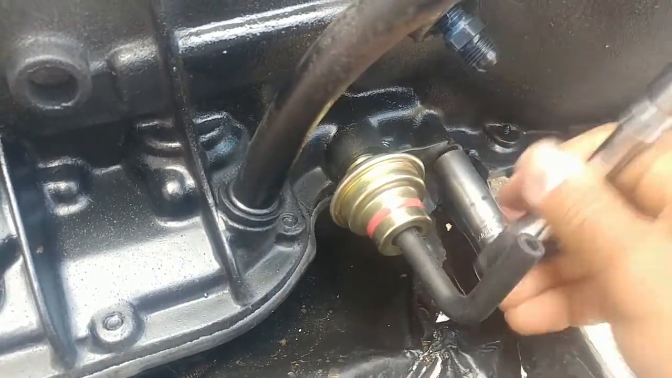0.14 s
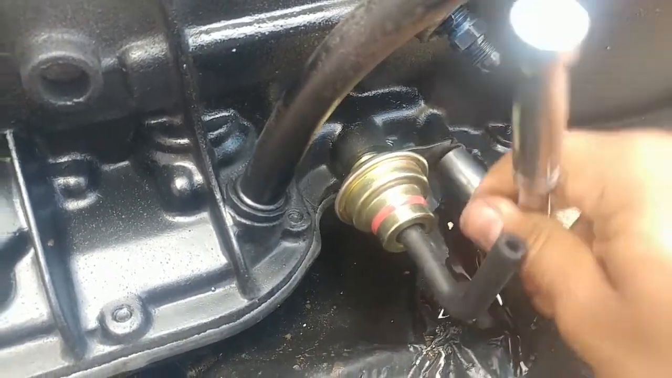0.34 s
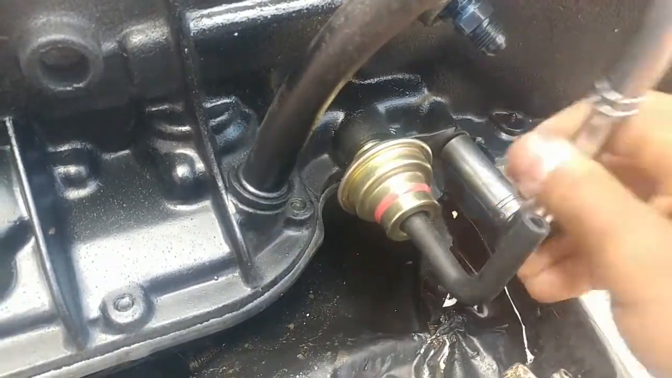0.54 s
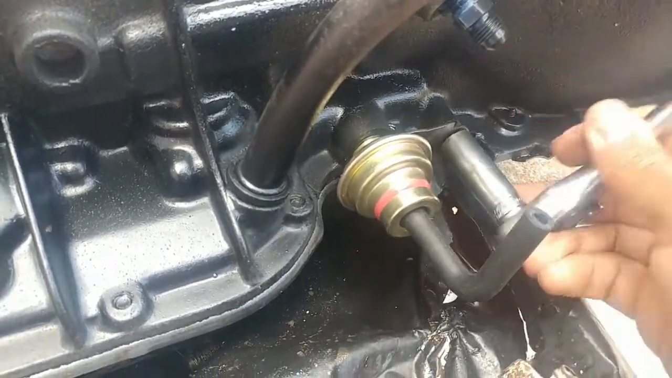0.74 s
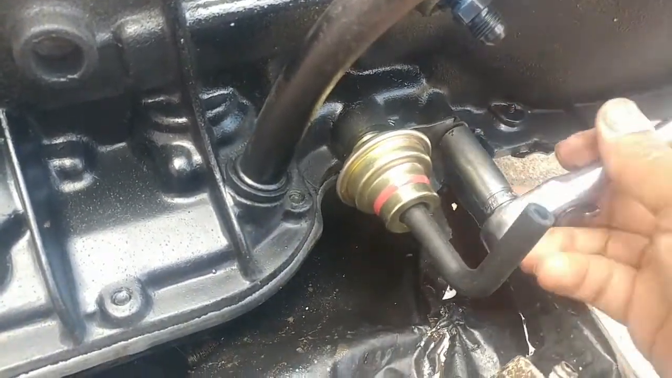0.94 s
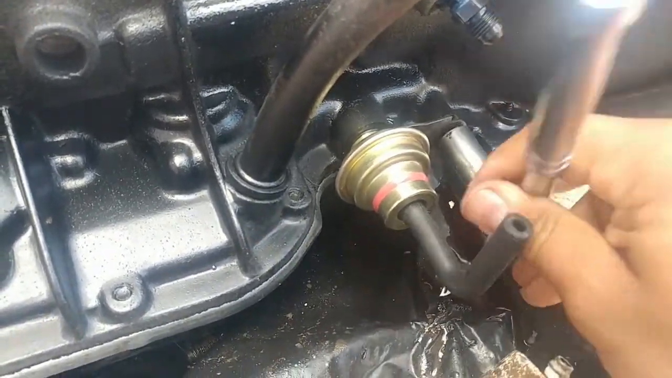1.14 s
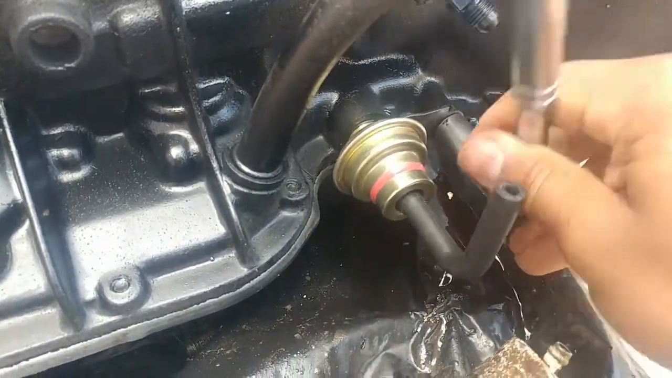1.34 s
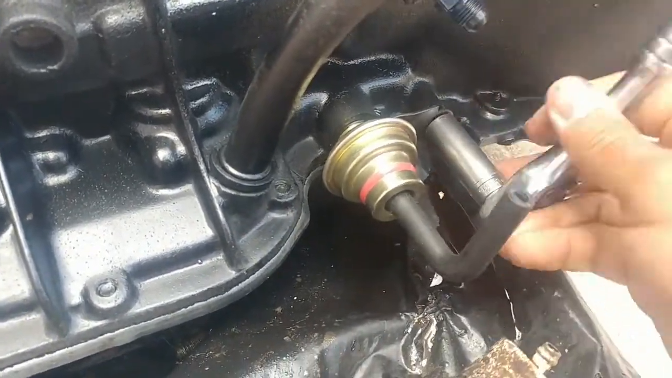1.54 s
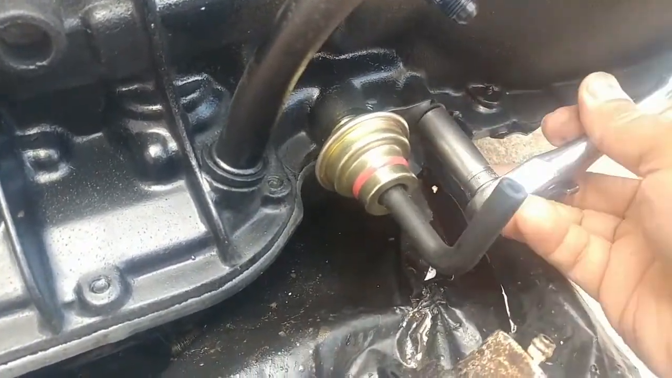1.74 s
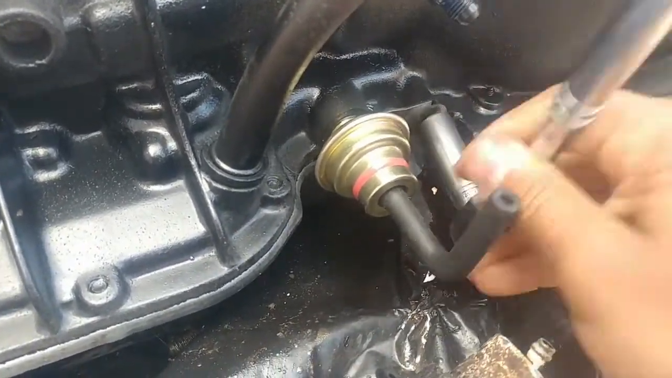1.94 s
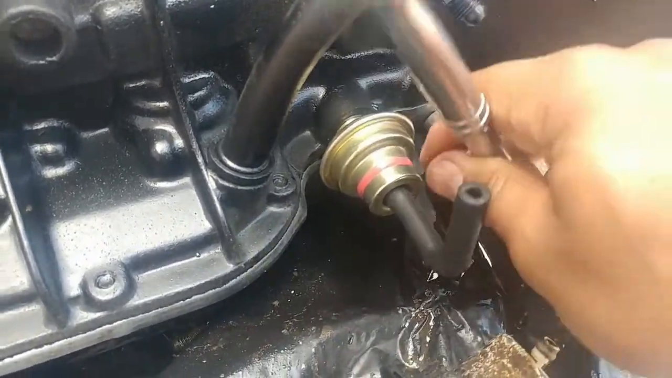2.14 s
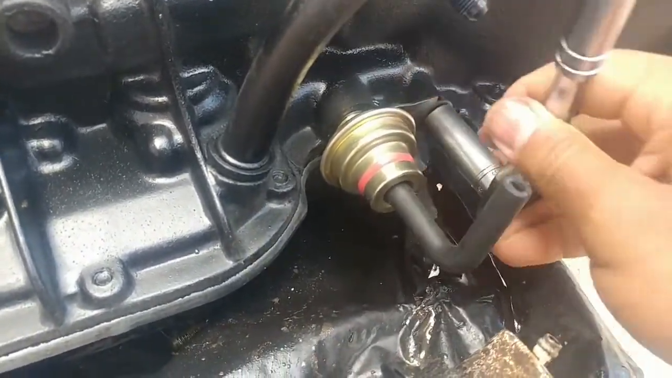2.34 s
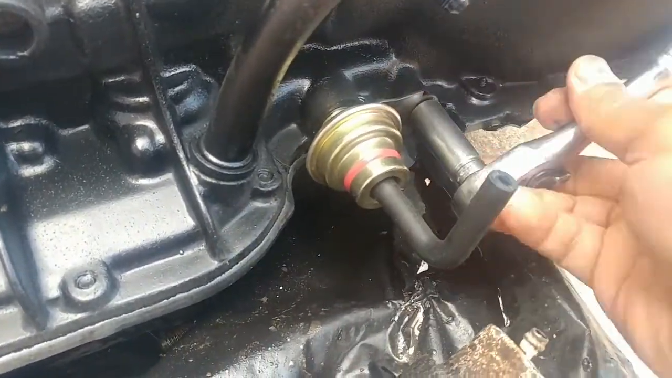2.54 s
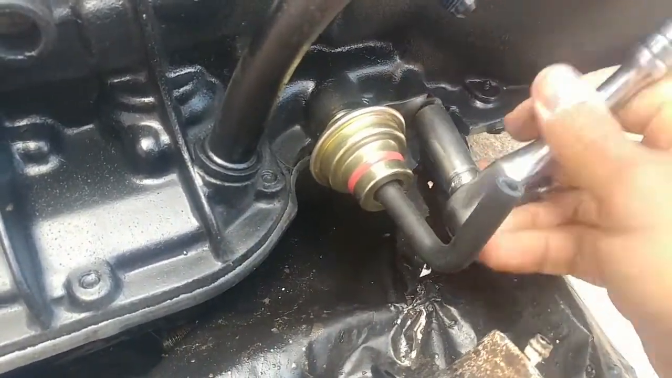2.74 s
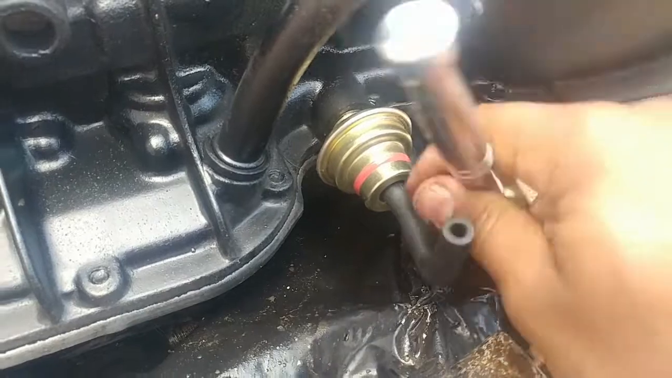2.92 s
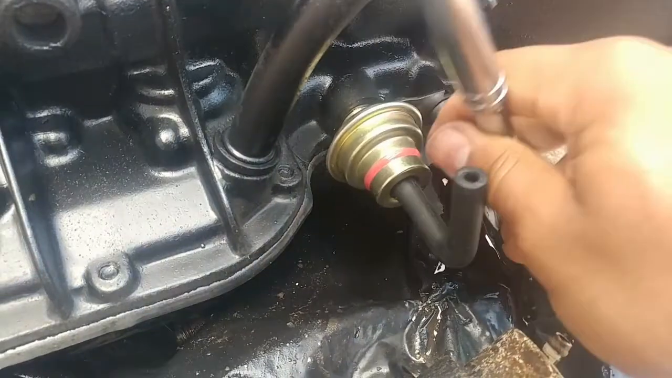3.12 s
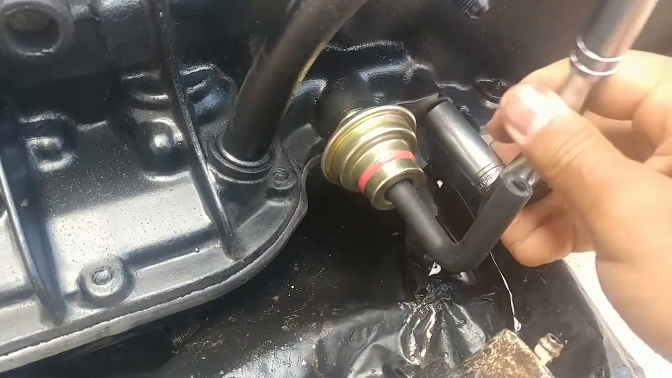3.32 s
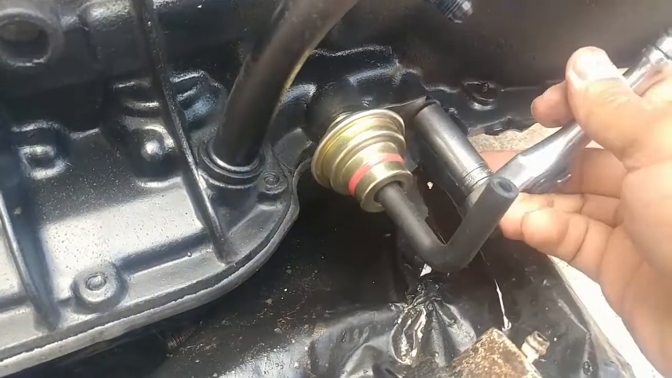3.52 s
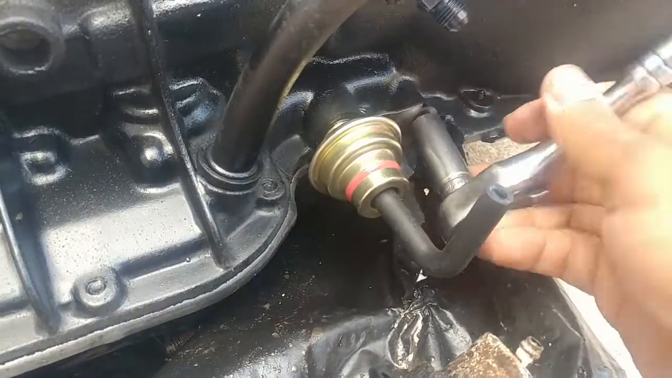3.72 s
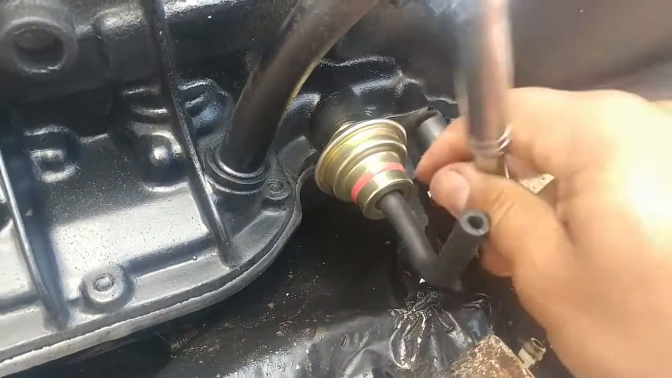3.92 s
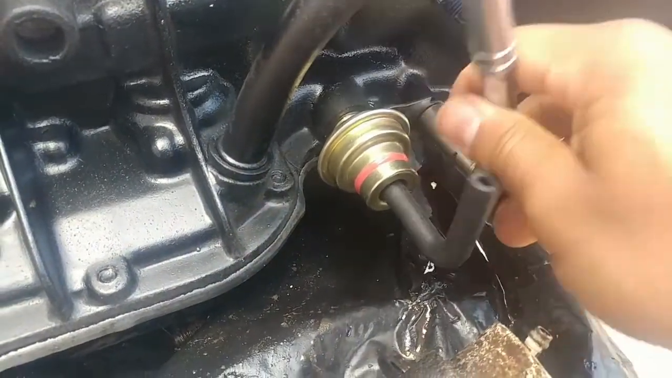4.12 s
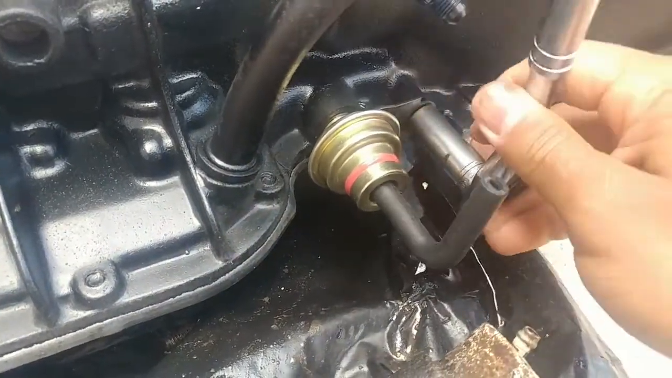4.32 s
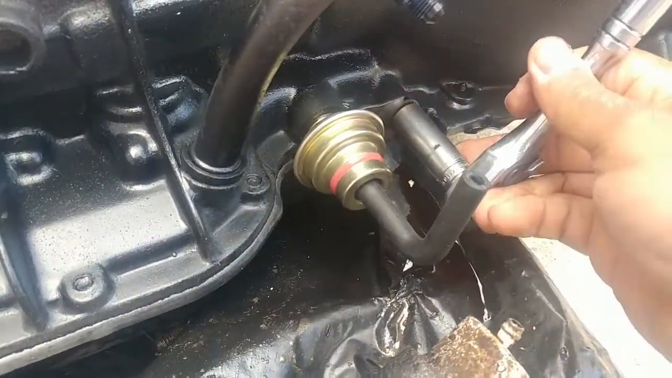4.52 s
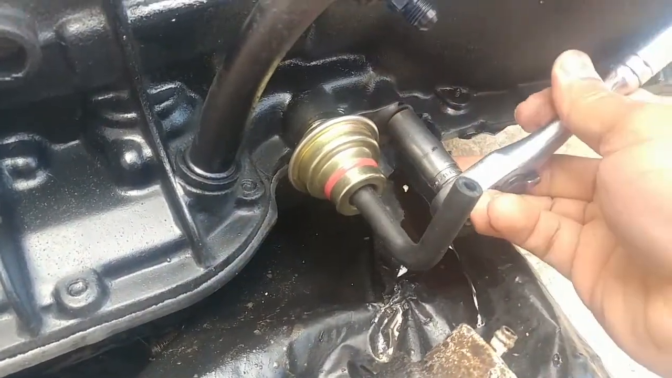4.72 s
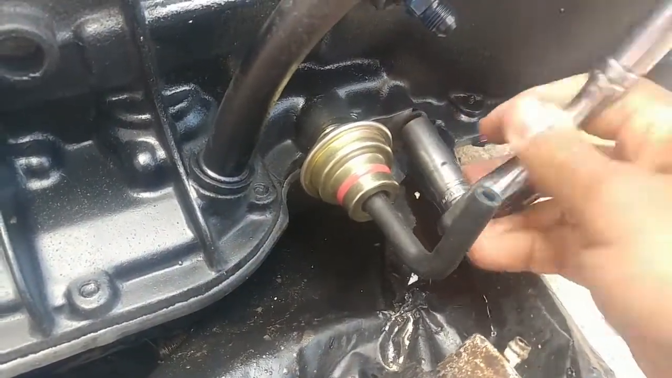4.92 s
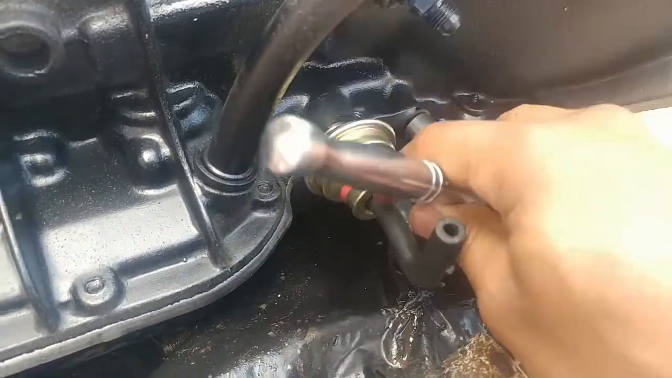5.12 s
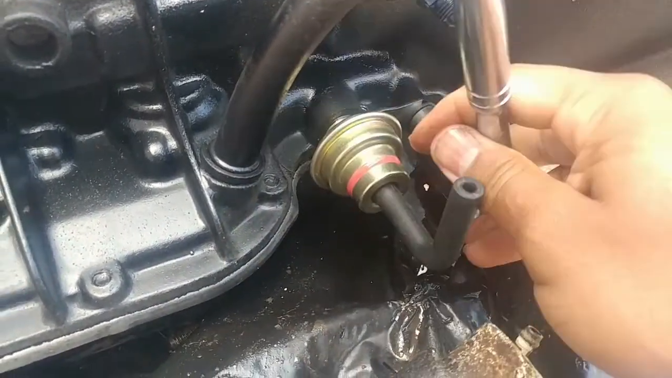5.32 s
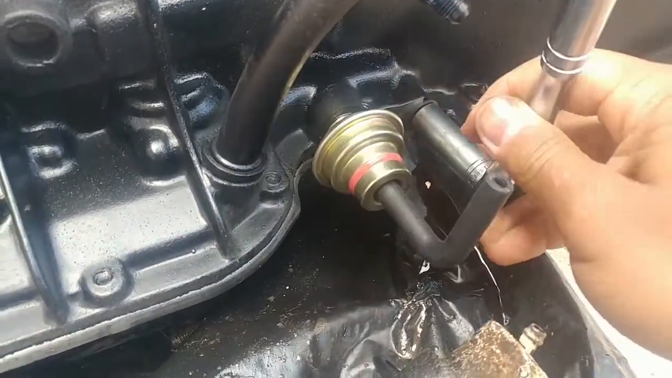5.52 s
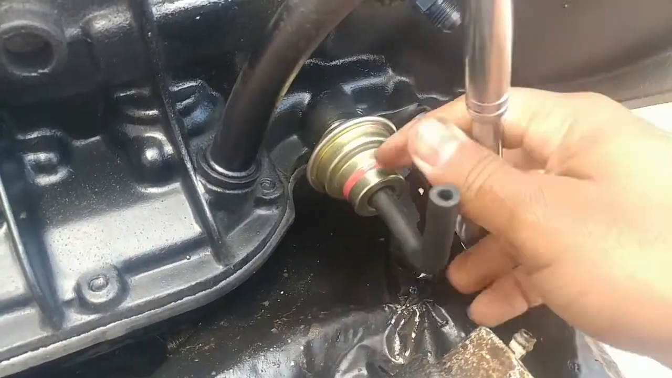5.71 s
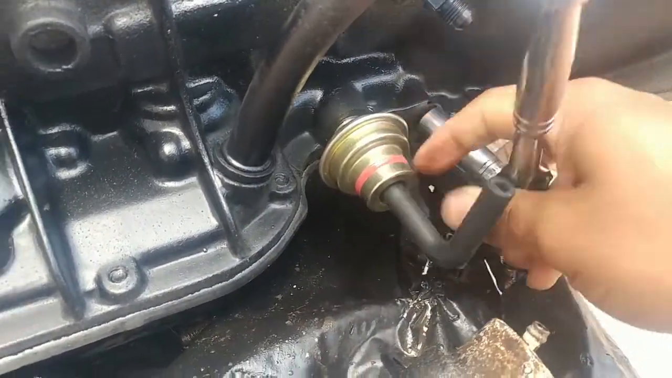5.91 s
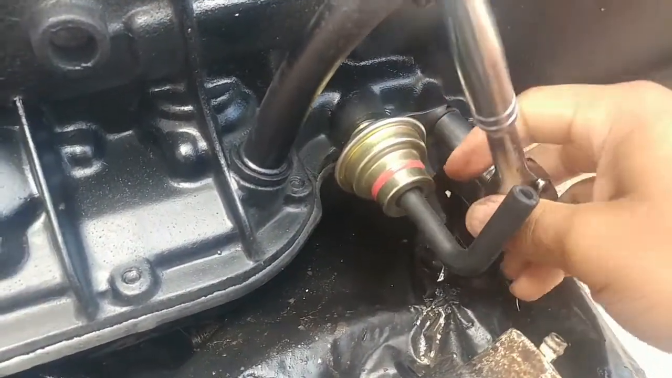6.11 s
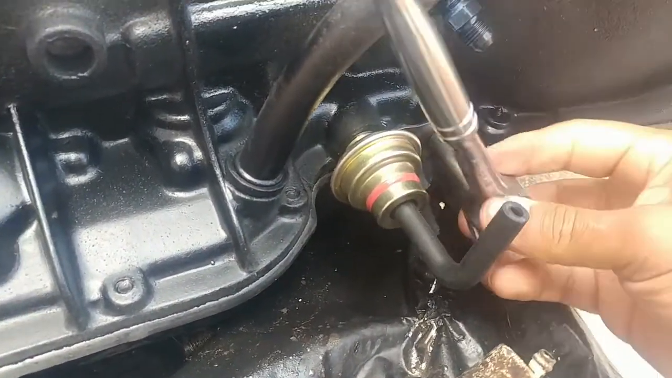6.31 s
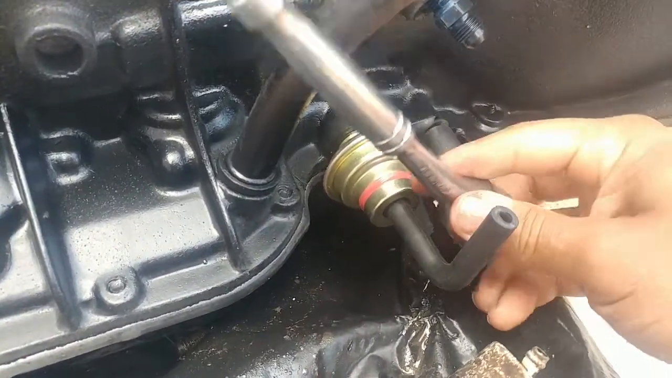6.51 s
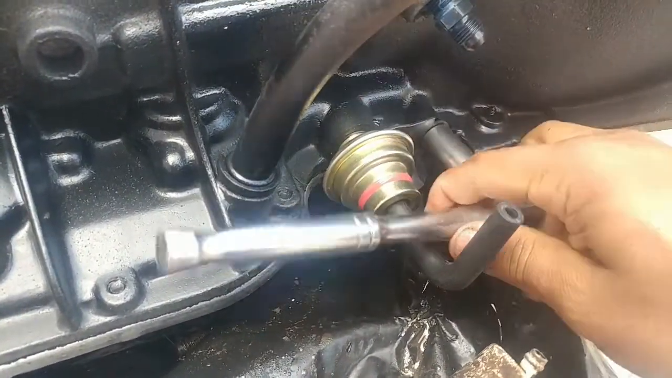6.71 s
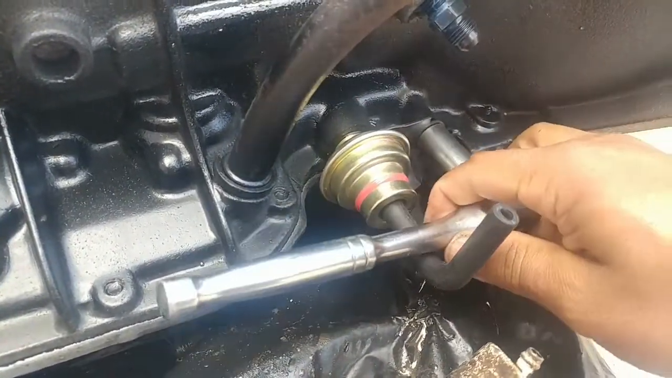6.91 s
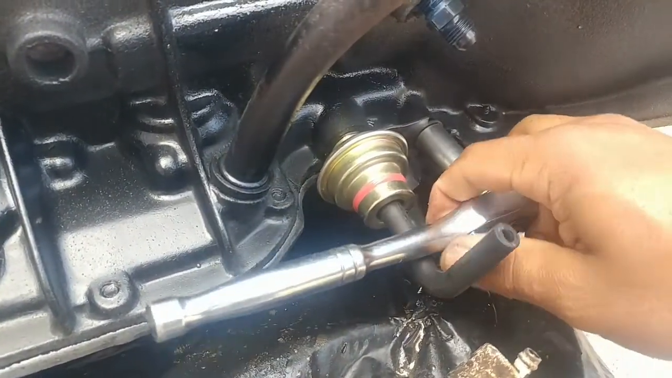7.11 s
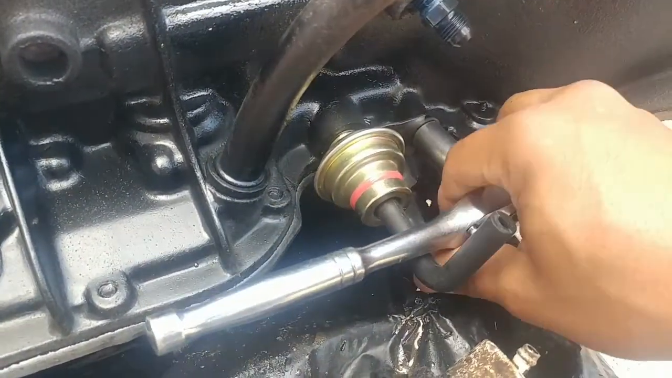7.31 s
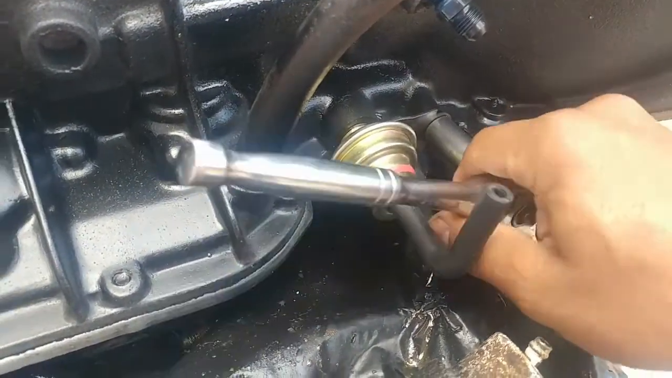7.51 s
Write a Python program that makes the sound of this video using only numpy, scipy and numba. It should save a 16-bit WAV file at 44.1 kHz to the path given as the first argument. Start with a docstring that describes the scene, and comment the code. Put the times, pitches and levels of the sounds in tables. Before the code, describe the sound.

Close-up ratchet work: fast bright clicking back swings, hard clacks of slack, handle clanging against a hollow casing, low wind buffeting the microphone.

```python
"""A socket ratchet runs a bolt into a transmission case, close to a hand-held phone in a garage.
On each back swing the pawl ticks over its teeth as fast as the handle moves: noise bursts with short rings.
The drive takes up its slack with a clack; the handle bangs the ringing case or knocks dully (decaying modes).
Shaped noise makes the rubbing, the faint garage hiss and the air that buffets the microphone.
A limiter holds the bangs down."""
import sys
import numpy as np
from scipy import signal
from scipy.fft import rfft, irfft, next_fast_len
from scipy.io import wavfile
from scipy.ndimage import uniform_filter1d
from numba import njit

SR = 44100
rng = np.random.default_rng(int(sys.argv[2]) if len(sys.argv) > 2 else 0)


def waveform_to_disk(signal):
    """Save audio, clipped to [-1, 1], as 16-bit WAV at the path in sys.argv[1]."""
    frames = np.transpose(np.atleast_2d(signal))
    scaled = np.clip(frames, -1, 1) * 32767
    samples = np.round(scaled).astype(np.int16)
    wavfile.write(sys.argv[1], SR, samples)


N = 333175
TIME = np.arange(N) / SR
PORT_SIGNS = np.array([[1], [-1]])  # left, right

# Back swings of the handle. Each row: first tooth in seconds, number of teeth, teeth per second at five
# even steps through the swing, relative tick level in dB, its fall over the swing in dB,
# relative body level in dB, pause in seconds before the handle turns forward.
BACK_SWINGS = [(0.1445, 9, (62.1, 52.1, 48.6, 29.8, 16.3), -14.5, 15, -27, 0.15),
               (1.0181, 11, (58.6, 48.4, 42.4, 47.0, 23.1), -20.5, 5, -24.5, 0.11),
               (1.8877, 12, (73.7, 50.7, 66.8, 38.5, 16.7), -15, 10, -23, 0.085),
               (2.7888, 11, (46.6, 59.9, 58.0, 33.2, 28.8), -18, 2, -21.5, 0.13),
               (3.7933, 12, (58.6, 40.6, 52.6, 49.2, 47.6), -18.5, 2, -23, 0.135),
               (4.9495, 12, (38.4, 53.8, 53.2, 72.6, 36.6), -14.5, 8, -23, 0.08)]
# Ringing modes of the cast case. Each row: frequency in Hz, relative level in dB.
CASE_RING_MODES = [(511, -8), (567, -5), (680, -5.5), (734, -3), (1020, -17), (1107, -5), (1379, -16.5),
                   (1446, -6), (1561, -17.5), (1616, -13.5), (1683, -7), (1789, -26), (2009, -17.5),
                   (2200, -13.5), (2259, -13), (2298, -11), (2438, -9.5), (2592, -10.5), (2672, -27.5),
                   (2858, -11), (2928, -7.5), (3085, -12), (3236, -13), (3414, -17.5), (3768, -14),
                   (4263, -16.5), (4512, -17), (4621, -16.5)]
# Spectrum of the dense wash of the case. Each row: frequency in Hz, relative level in dB.
CASE_WASH_SPECTRUM = [(200, -21), (330, 5), (470, -6), (850, 2), (1700, 3), (3100, -4), (4000, -2.5),
                      (4700, -9), (6500, -16.5), (7300, -27), (9000, -24.5), (10500, -43), (15000, -38.5)]
# Spectrum of a hard snap of steel on metal. Each row: frequency in Hz, relative level in dB.
SNAP_SPECTRUM = [(250, -13), (600, -10), (1200, -1.5), (2000, -0.5), (2900, 2), (3800, -2.5), (4500, -9),
                 (6200, -5), (7600, -2.5), (8700, 0.5), (9700, -9), (10500, -21), (15000, -27.5)]


def undb(db):
    """Decibels to gain."""
    return 10 ** (np.asarray(db) / 20)


def unit(x):
    """Scale to rms 1."""
    return x / np.sqrt(np.mean(x ** 2))


def add(out, s, sound):
    """Mix a stereo sound in at time s."""
    start = max(int(s * SR), 0)
    part = sound[:, :max(N - start, 0)]
    out[:, start:start + part.shape[1]] += part


def fade(t60, size):
    """Exponential decay, 60 dB down after t60 seconds."""
    return np.exp(-np.log(1000) * np.arange(size) / SR / t60)


def colour(x, spectrum):
    """Causal minimum-phase filter with the given (Hz, dB) shape, so that attacks stay sharp."""
    size = next_fast_len(x.shape[1] // 2 + 1024) * 2
    hz, db = np.transpose(spectrum)
    freq = np.maximum(np.arange(size // 2 + 1) * SR / size, 1)
    gain = undb(np.interp(np.log(freq), np.log(hz), db))
    # folding the cepstrum onto positive time gives minimum phase
    cepstrum = irfft(np.log(gain))
    cepstrum[1:size // 2] *= 2
    cepstrum[size // 2 + 1:] = 0
    response = np.exp(rfft(cepstrum))
    return irfft(rfft(x, size) * response, size)[:, :x.shape[1]]


def noise(size, apart_hz=1100, width=0.99):
    """Noise at two microphone ports: alike in the bass, different in the treble."""
    mid, side = rng.standard_normal((2, size))
    side = width * signal.sosfilt(signal.butter(1, apart_hz, "high", fs=SR, output="sos"), side)
    return np.array([mid + side, mid - side])


def walk(rate):
    """Smooth random wandering with new targets at the given rate in Hz, spread near 1."""
    hold = max(int(SR / rate), 1)
    steps = np.repeat(rng.standard_normal(N // hold + 1), hold)[:N]
    return 1.3 * uniform_filter1d(uniform_filter1d(steps, hold), hold)


def burst(spectrum, t60, size=16384):
    """Countless close modes struck together and dying away, as fading noise; about rms 1 at the start."""
    envelope = fade(t60, size)
    return unit(colour(noise(size) * envelope, spectrum)) * np.sqrt(np.mean(envelope ** 2))


def ring(modes, t60, damping=0., scatter_db=3.0, apart_hz=1150, size=16384):
    """Single modes struck together, higher ones more out of step at the two ports; t60 holds at 1 kHz."""
    out, power = 0, 0
    for hz, db in modes:
        port_shift = PORT_SIGNS * rng.uniform(-0.97, 1) * min(hz / apart_hz, np.pi / 2)
        phase = rng.uniform(0, 2 * np.pi) + port_shift
        gain = undb(db + scatter_db * rng.standard_normal())  # no two blows land on the same spot
        mode_t60 = t60 * (hz / 1000) ** -damping  # with damping, higher modes die sooner
        out = out + gain * fade(mode_t60, size) * np.sin(2 * np.pi * hz * TIME[:size] + phase)
        power += gain ** 2 / 2
    return out / np.sqrt(power)


def room(x, t60, wet_db, dull_hz=8000):
    """Short scatter from the metal and walls around the tool: dulled, fading noise as an echo."""
    echo = rng.standard_normal((2, 16384)) * fade(t60, size=16384)
    echo[:, :130] = 0  # the first 3 ms stay dry
    echo = signal.sosfilt(signal.butter(1, dull_hz, fs=SR, output="sos"), echo)
    echo /= np.sqrt(np.sum(echo ** 2) / 2)
    return x + undb(wet_db) * signal.fftconvolve(x, echo, axes=1)[:, :N]


def garage_hiss(level_db=-64):
    """The faint hiss of the garage, as steady shaped noise."""
    # Each row: frequency in Hz, relative level in dB.
    hiss_spectrum = [(180, -34), (300, -7.5), (431, -12), (600, -7), (708, -6), (892, -17), (1670, -20),
                     (8560, -29.5), (15500, -53)]
    return undb(level_db) * unit(colour(noise(N), hiss_spectrum))


def eddies(spectrum, gust_db=3):
    """Turbulence at each port separately, wandering in strength."""
    return unit(colour(rng.standard_normal((2, N)) * undb(gust_db * walk(35)), spectrum))


def air(flutter_db=-9, flutter_growth=1.364, gust_s=0.035, flutter_s=0.0059):
    """Eddies rumble, and flutter as the breeze grows; a buffet swells both, mostly on one port."""
    # Breeze at the two ports. Each row: time in seconds, left level in dB, right level in dB.
    breeze = [(0.0, -41, -40), (0.75, -43.5, -31), (1.15, -34.5, -34), (1.65, -39, -37.5),
              (1.95, -33, -27.5), (2.8, -27.5, -18.5), (3.3, -29, -17), (3.8, -36, -16),
              (3.951, -31, -30.5), (4.499, -30.5, -28.5), (4.75, -28, -19), (5.15, -33, -31.5),
              (5.7, -37.5, -30), (6.35, -42.5, -31.5), (6.62, -39.5, -37), (6.799, -37.5, -29),
              (7.15, -40.5, -38.5), (7.55, -40.5, -30.5)]
    # Single buffets. Each row: time in seconds, rumble in dB, flutter in dB, left minus right in dB.
    buffets = [(0.25, -28, -28, -10), (1.844, -15.5, -18.5, -32), (2.15, -25.5, -25.5, 29),
               (2.265, -53, -25, -20), (3.097, -28, -7.5, -24), (3.181, -17, -8.5, -29),
               (3.5, -10, -15, -28), (3.69, -15, -15, -27), (3.762, -24, -14.5, -23),
               (4.436, -30.5, -26.5, -11.5), (5.295, -44, -31, 18), (5.855, -28, -21, -28),
               (5.98, -26, -28, -20.5), (6.02, -13, -23, -27), (7.001, -24, -43, -17.5),
               (7.278, -22.5, -27.5, 14.5), (7.531, -26, -30, -18)]
    # Spectrum of the rumble. Each row: frequency in Hz, relative level in dB.
    rumble_spectrum = [(15, -3), (40, 4), (90, -3), (150, -10), (250, -23), (450, -38), (900, -55),
                       (3000, -75.5)]
    # Spectrum of the flutter. Each row: frequency in Hz, relative level in dB.
    flutter_spectrum = [(20, -30), (100, 2), (200, 5), (400, -7.5), (800, -29), (2500, -85)]
    s, left_db, right_db = np.transpose(breeze)
    rumble = undb([np.interp(TIME, s, left_db), np.interp(TIME, s, right_db)])
    flutter = undb(flutter_db) * rumble ** flutter_growth  # flutter outgrows the rumble
    for s, rumble_db, eddy_db, pan_db in buffets:
        ports = undb(np.minimum(0, [[pan_db], [-pan_db]]))
        swell = np.exp(-((TIME - s) / gust_s) ** 2)
        age = np.maximum((TIME - s) / flutter_s + 1, 0)  # flutter rises for flutter_s and peaks at s
        rumble = rumble + ports * undb(rumble_db) * swell
        flutter = flutter + ports * undb(eddy_db) * age * np.exp(1 - age)
    return rumble * eddies(rumble_spectrum) + flutter * eddies(flutter_spectrum)


def tooth_times(start, count, rates):
    """When the pawl drops during one swing, from the changing speed of the handle."""
    steps = np.linspace(0, 1, count - 1)
    rate = np.interp(steps, np.linspace(0, 1, len(rates)), rates)
    return start + np.append(0, np.cumsum(1 / rate))


def rubs(grain_db=4, slip_db=4.0, peak_db=1):
    """Friction swells and fades with each movement, in fine grains and uneven slips."""
    # The socket scrapes on the bolt, or fingers slide on the steel.
    # Each row: start in seconds, end in seconds, relative level in dB.
    scrapes = [(1.494, 1.52, -35.5), (2.39, 2.437, -29.5), (3.325, 3.37, -28), (4.37, 4.408, -32),
               (5.57, 5.7, -54), (5.67, 5.795, -43.5), (5.825, 5.925, -44), (6.215, 6.265, -51.5),
               (6.3, 6.44, -57.5), (6.66, 6.83, -50), (7.423, 7.56, -53)]
    # Spectrum of the friction. Each row: frequency in Hz, relative level in dB.
    friction_spectrum = [(300, -4.5), (700, 1.5), (1400, -7.5), (2700, -2), (4500, -4), (7200, -12),
                         (9000, -6.5), (10500, -29.5), (13000, -24), (15500, -28)]
    moves = list(scrapes)
    for start, count, rates, _, _, _, pause in BACK_SWINGS:
        end = tooth_times(start, count, rates)[-1]
        moves.append((start - 0.04, end + 0.04, -47))  # the head rubs all through the back swing
        turn = end + pause
        moves.append((turn, turn + 0.067, -48))  # and briefly as the handle turns forward
    pressure = np.zeros(N)
    for start, end, db in moves:
        place = (2 * TIME - start - end) / (end - start)  # -1 at the start, 1 at the end
        pressure += undb(db + peak_db) * np.exp(-np.abs(place) ** 3)
    grains = noise(N) * undb(grain_db * walk(1800) + slip_db * walk(70))
    return unit(colour(grains, friction_spectrum)) * pressure


def taps(t60=0.016):
    """The handle shifts in the grip with a faint tap, a very short noise burst."""
    # Each row: time in seconds, level in dB.
    grip_taps = [(5.617, -43), (5.768, -36), (6.049, -41.5), (6.067, -43), (6.789, -35.5), (7.01, -45),
                 (7.08, -47.5), (7.53, -32)]
    out = np.zeros((2, N))
    for s, db in grip_taps:
        add(out, s, undb(db) * burst(CASE_WASH_SPECTRUM, t60))
    return out


def knocks(thud_t60=0.075, thud_db=-1, ring_db=1, ring_t60=0.085):
    """A padded blow during the back swing wakes only low, short modes."""
    # Each row: time in seconds, relative level in dB.
    dull_blows = [(0.249, -13.5), (1.307, -34), (2.0109, -3), (2.8884, -6.5), (3.031, -30), (3.989, -33)]
    # Modes woken by the blow. Each row: frequency in Hz, relative level in dB.
    low_modes = [(423, -7), (509, 4.5), (693, 0.5), (1061, -0.5), (868, -4), (1130, -12), (1399, -10),
                 (1890, -14), (2058, -21), (2280, -18)]
    # Spectrum of the thud. Each row: frequency in Hz, relative level in dB.
    thud_spectrum = [(100, -11.5), (250, -6.5), (400, -1), (620, -7.5), (850, -8.5), (1150, -8),
                     (1500, -21), (2400, -39), (3500, -27), (8000, -43.5)]
    out = np.zeros((2, N))
    for s, db in dull_blows:
        modes = undb(ring_db) * ring(low_modes, ring_t60, apart_hz=2500)
        thud = undb(thud_db) * burst(thud_spectrum, thud_t60)
        add(out, s, undb(db) * (modes + thud))
    return out


def case_contact(spot_hz, contact, case_t60=.15, wash_t60=0.16, wash_db=-5):
    """One touch of handle on case: modes over a dense wash, with more favoured modes and less wash each time."""
    boost_db, wash_fall_db = 1 + 3 * contact, 1.5 * contact
    modes = []
    for hz, mode_db in CASE_RING_MODES:
        octaves = np.log2(hz / spot_hz)
        modes.append((hz, mode_db + boost_db * np.exp(-(octaves / 0.14) ** 2)))
    wash = undb(wash_db - wash_fall_db) * burst(CASE_WASH_SPECTRUM, wash_t60)
    return ring(modes, case_t60, damping=0.028, scatter_db=2) + wash


def bangs(clank_t60=0.048, clank_wash_db=-6, handle_t60=0.077, handle_db=-1, crack_t60=.018,
          case_trim_db=-2, chatter_gap_s=0.011, chatter_first_db=-5, chatter_fall_db=2.5, count=4):
    """Steel on cast metal: a crack, the clank of the handle, and the case, struck again as the handle chatters."""
    # Each row: time in seconds, relative levels in dB of case ring, handle clank and contact crack,
    # frequency in Hz around which this spot favours the case modes.
    blows = [(0.8543, -13.5, 3, -0.5, 540), (0.8678, -7.5, -0.5, -12, 540), (1.7056, -11.5, 4.5, 1, 536),
             (1.717, 2, 8.5, 3, 733), (2.5093, -10, -0.5, -18, 630), (2.5684, 9.5, -4, -8, 735),
             (3.4565, -8, 1, -7.5, 1650), (3.513, -0.5, -12, -27, 614), (3.627, -20.5, -34, -52, 535),
             (4.529, -11.5, -5.5, -22, 688), (4.649, -24.5, -41, -43, 540), (4.666, 10, 4.5, -16, 735)]
    # Modes of the steel handle. Each row: frequency in Hz, relative level in dB.
    steel_modes = [(1450, -15), (1685, -16.5), (2440, -13.5), (2595, -3), (2720, -9), (2860, 1), (2930, 1),
                   (3030, 4.5), (3116, 11), (3230, -2), (3300, -7.5), (3420, -6), (3570, -16), (3830, -12),
                   (5500, -15), (5880, -7.5), (6160, -16)]
    # Spectrum of the clank. Each row: frequency in Hz, relative level in dB.
    clank_spectrum = [(300, -21), (600, 6.5), (1700, -15), (2400, -30.5), (2900, 3), (3200, -4),
                      (4200, -9.5), (5000, -6), (5900, 5.5), (7000, -15.5), (9000, -43), (14000, -56.5)]
    out = np.zeros((2, N))
    for s, case_db, clank_db, crack_db, spot_hz in blows:
        clank = undb(handle_db) * ring(steel_modes, handle_t60)
        clank = clank + undb(clank_wash_db) * burst(clank_spectrum, clank_t60)
        crack = burst(SNAP_SPECTRUM, crack_t60)
        add(out, s, undb(clank_db) * clank + undb(crack_db) * crack)
        # the first contact, then softer and softer chatter
        delays = np.append(0, np.cumsum(chatter_gap_s * (.5 + rng.random(count))))
        contacts_db = np.append(0, chatter_first_db - chatter_fall_db * np.arange(count))
        for contact, (delay, db) in enumerate(zip(delays, contacts_db)):
            level = undb(case_db + case_trim_db + db)
            add(out, s + delay, level * case_contact(spot_hz, contact))
    return out


def clacks(t60=.032, tail_t60=0.13, tail_db=-16, case_db=-28, socket_t60=0.032, socket_db=-6):
    """Drive and socket snap together, and a little of the blow passes through the bolt into the case."""
    # Slack taken up in the socket. Each row: time in seconds, relative level in dB, socket ring in Hz.
    slack_snaps = [(0.5838, -3, 2895), (1.4379, -6, 2830), (1.45, -13, 2120), (2.3527, -2.5, 2740),
                   (3.2549, -0.5, 3530), (4.2468, -3, 1687), (5.439, -6.5, 2860), (5.451, -6.5, 3150)]
    out = np.zeros((2, N))
    for s, db, hz in slack_snaps:
        socket = undb(socket_db) * ring([(hz, 0), (8700, -3)], socket_t60)
        snap = burst(SNAP_SPECTRUM, t60) + socket
        tail = undb(tail_db) * burst(SNAP_SPECTRUM, tail_t60)
        case = undb(case_db) * ring(CASE_RING_MODES, tail_t60)
        add(out, s, undb(db) * (snap + tail + case))
    return out


def teeth(single_head_hz=8700, head_start_hz=8010, head_end_hz=8500, head_scatter_hz=150,
          first_tooth_db=-6, first_body_db=-3, scatter_db=0.5):
    """Every tooth passed, as (s, tick dB, head Hz, body dB); through a swing ticks soften and tend to rise in pitch."""
    # The pawl slips over one tooth as the handle is nudged.
    # Each row: time in seconds, relative tick level in dB, relative body level in dB.
    single_slips = [(0.414, -39, -28.5), (1.0104, -46, -33.5), (1.2832, -50, -28.5), (1.3045, -37, -29),
                    (1.503, -34, -36), (1.872, -36, -42), (2.403, -36, -45), (2.427, -36, -50),
                    (4.9212, -40.5, -35.5), (6.028, -55, -49.5), (6.13, -59.5, -58), (6.215, -33.5, -40.5),
                    (6.5225, -20, -29), (6.6013, -24, -27), (6.6686, -18, -27), (6.7093, -20, -24),
                    (6.774, -21, -31.5), (6.876, -22, -31), (7.2389, -25, -31)]
    rows = [(s, db, single_head_hz, body_db) for s, db, body_db in single_slips]
    for start, count, rates, db, fall_db, body_db, _ in BACK_SWINGS:
        times = tooth_times(start, count, rates)
        progress = np.linspace(0, 1, len(times))
        first = progress == 0  # the first tooth is only half lifted
        chance = rng.standard_normal((3, len(times)))  # no two teeth are alike
        ticks = db - fall_db * progress + first_tooth_db * first + scatter_db * chance[0]
        heads = head_start_hz + (head_end_hz - head_start_hz) * progress + head_scatter_hz * chance[1]
        bodies = body_db + first_body_db * first + scatter_db * chance[2]
        rows += zip(times, ticks, heads, bodies)
    return rows


def pawl(top_t60=0.017, body_t60=0.025, head_t60=0.018, gear_t60=0.028, top_db=4, head_db=2, body_db=4,
         gear_db=-1, bounce_db=-10, pan_db=0.5, rise_s=0.00044, size=3000):
    """Each tooth snaps the pawl against the gear: a bright tick, short rings of head and gear, a small bounce."""
    # Spectrum of the bright tick. Each row: frequency in Hz, relative level in dB.
    tick_spectrum = [(5500, -35), (7200, -9.5), (8000, -0.5), (9000, -1), (10200, -20), (11500, -17),
                     (13000, -11), (15500, -17)]
    # Spectrum of the tool body. Each row: frequency in Hz, relative level in dB.
    body_spectrum = [(500, -13.5), (1500, -14.5), (2700, -7), (3700, -4), (4500, -0.5), (5200, -4),
                     (6300, -2.5), (7500, -16.5), (10000, -35.5)]
    out = np.zeros((2, N))
    rise = 1 - np.exp(-TIME[:size] / rise_s)  # slightly softened onset
    for s, db, hz, low_db in teeth():
        tick = undb(top_db) * burst(tick_spectrum, top_t60, size=size)
        head = undb(head_db) * ring([(hz, 0)], head_t60, size=size)
        body = undb(body_db) * burst(body_spectrum, body_t60, size=size)
        grip = 1 + 0.05 * rng.standard_normal()  # the fingers shift the lower modes
        gear_modes = [(3000 * grip, -2), (4500 * grip, 0)]
        gear = undb(gear_db) * ring(gear_modes, gear_t60, scatter_db=1, size=size)
        pan = undb(pan_db * rng.standard_normal() * PORT_SIGNS)
        add(out, s, pan * rise * (undb(db) * (tick + head) + undb(low_db) * (body + gear)))
        bounce_s = s + rng.uniform(0.0002, 0.0024)
        add(out, bounce_s, pan * undb(db + bounce_db) * tick)
    return out


def scene():
    """The tool in its surroundings, moving air and the faint hiss of the garage."""
    small_sounds = room(rubs() + taps() + clacks() + pawl(), t60=0.1, wet_db=-16.0)
    blows = room(knocks() + bangs(), t60=.15, wet_db=-17)
    return garage_hiss() + air() + blows + small_sounds


@njit
def held_peak(x, release):
    """Follows peaks at once and lets go slowly."""
    out, peak = np.empty(len(x)), 0.
    for i in range(len(x)):
        peak = max(x[i], peak * release)
        out[i] = peak
    return out


def record(dry, ceiling_db=-10.5, window=350, release_s=.016, top_hz=16000):
    """A limiter flattens the bangs, so that their ring seems to last; brief peaks slip through; then the top is cut."""
    power = uniform_filter1d(np.mean(dry ** 2, axis=0), window)  # window in samples
    loudness = held_peak(np.sqrt(np.abs(power)), np.exp(-1 / (release_s * SR)))
    gain = np.minimum(1, undb(ceiling_db) / (loudness + 1e-9))
    gain = uniform_filter1d(gain, size=90)
    limited = np.clip(dry * gain, -1, 1)
    return signal.sosfilt(signal.ellip(8, .2, 70, top_hz, fs=SR, output="sos"), limited)


dry = scene()
out = record(dry)
waveform_to_disk(out)
```